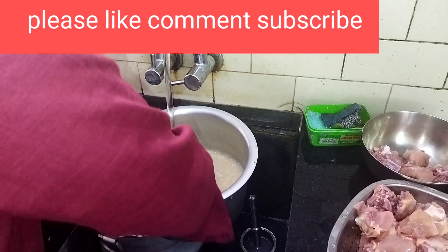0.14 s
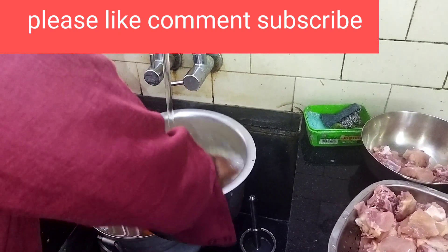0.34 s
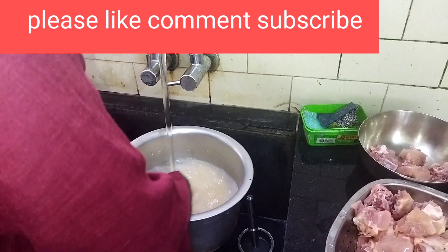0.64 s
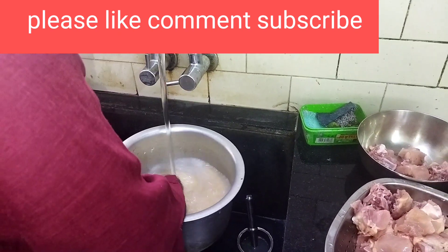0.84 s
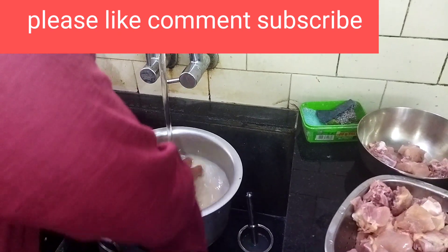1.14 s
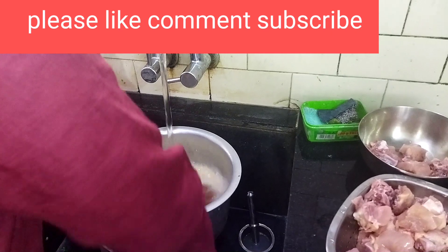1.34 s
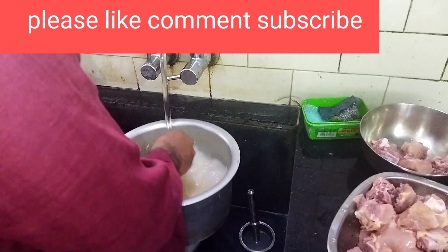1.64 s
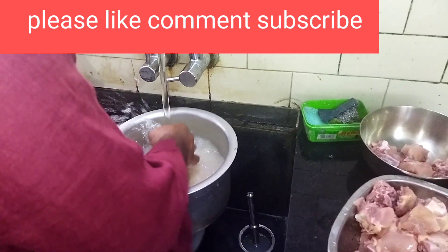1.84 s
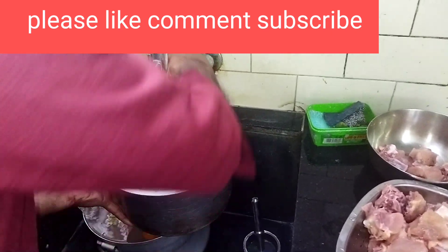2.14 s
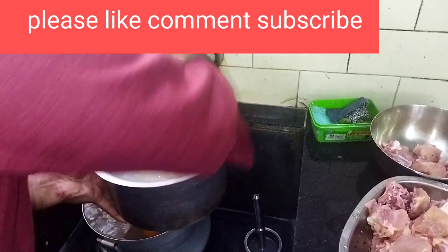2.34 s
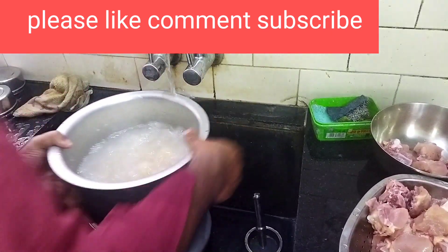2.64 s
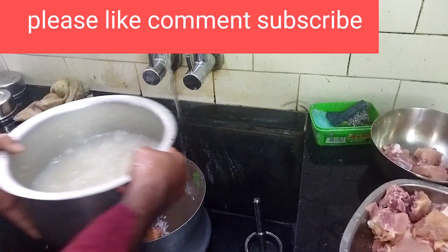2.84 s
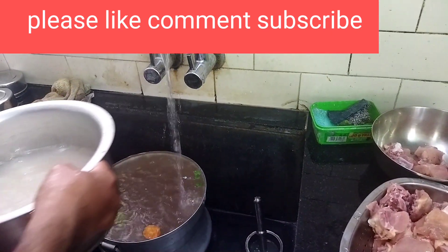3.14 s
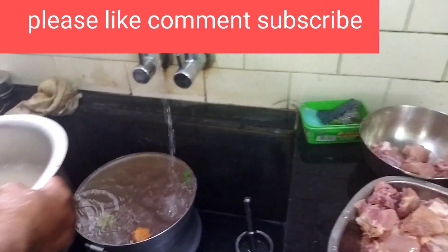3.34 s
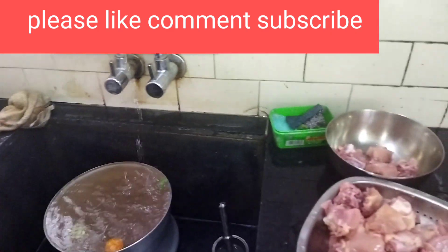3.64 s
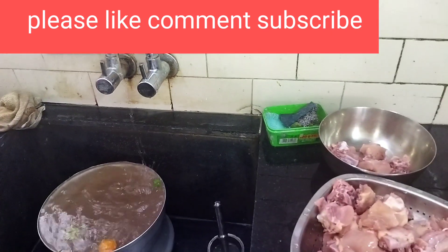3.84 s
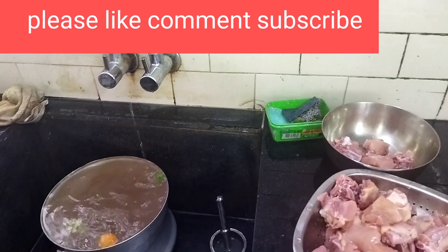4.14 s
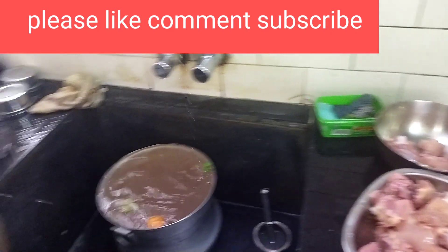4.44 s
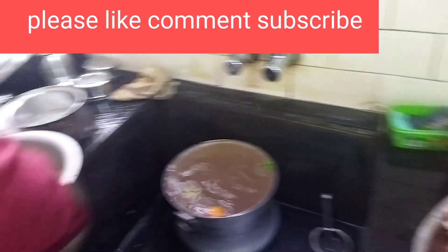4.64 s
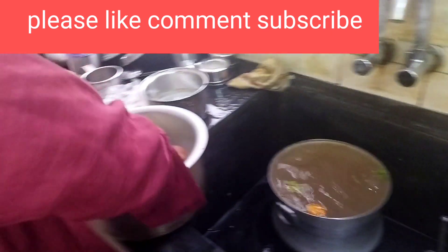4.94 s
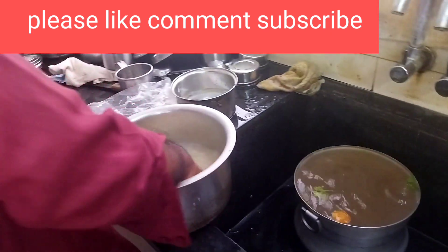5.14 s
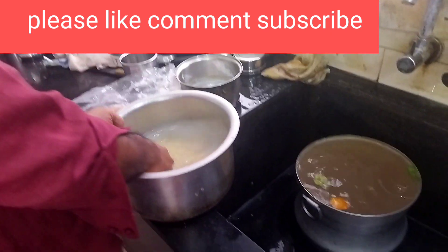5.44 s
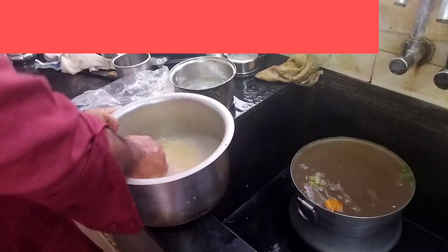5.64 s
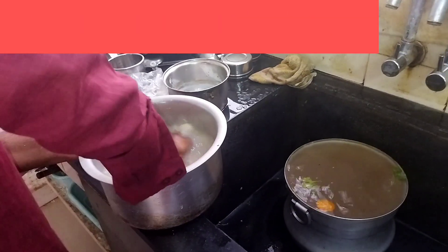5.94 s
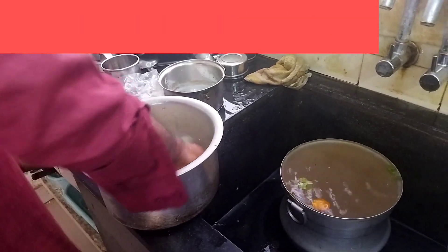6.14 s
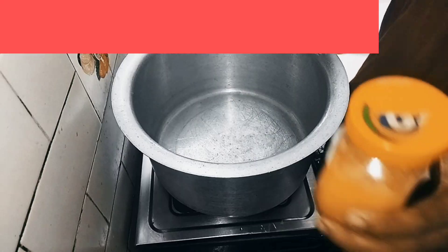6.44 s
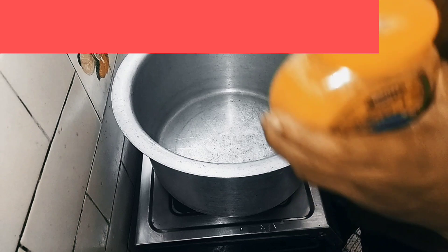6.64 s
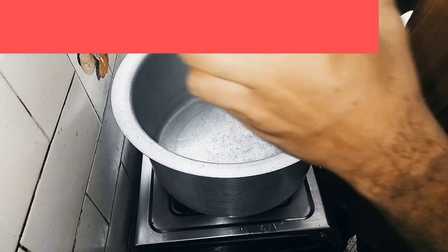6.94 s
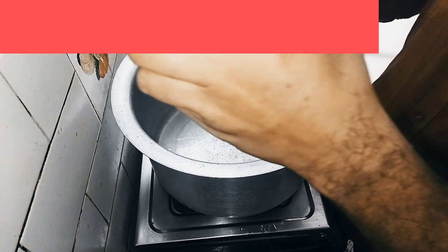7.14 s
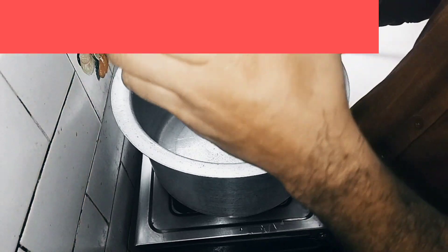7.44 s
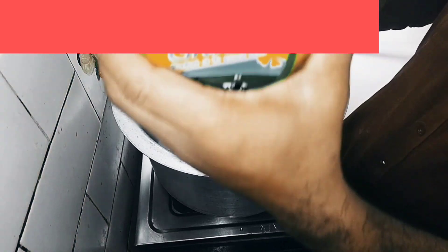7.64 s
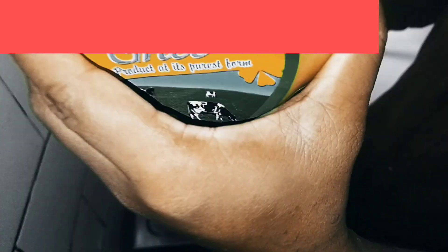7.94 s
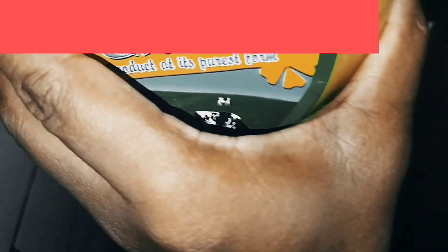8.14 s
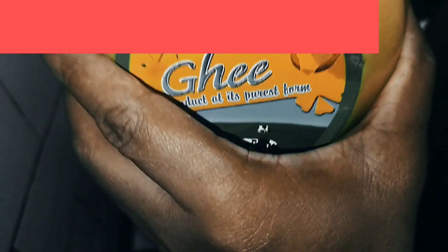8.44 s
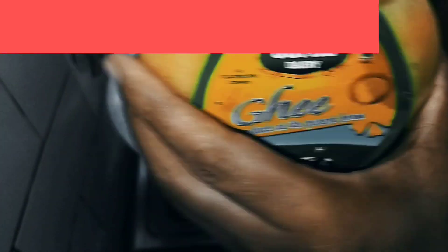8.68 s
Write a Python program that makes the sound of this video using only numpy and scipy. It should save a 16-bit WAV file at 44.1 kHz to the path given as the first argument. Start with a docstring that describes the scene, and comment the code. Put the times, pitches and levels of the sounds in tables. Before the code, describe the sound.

Splashy rice washing under a running tap, a heavy pot knocking down, sparse drips, then a quick fade to low roar with soft rubbing and tiny chinks.

```python
"""A tiled kitchen, heard by two microphone ports: tap water runs into a metal pot while a hand swirls rice in it.
The pot is lifted away and set down with a knock, and the tap dribbles out.
After a quick fade, a second spot by the stove: a low roar, soft swishes, bumps and tiny metal chinks.
Water is made of many small bubbles plus hiss; knocks and chinks are short bursts that ring or die away;
the roar, swishes and background are shaped noise, and a faint appliance hum lies under the first spot."""
import sys
import numpy as np
from scipy import signal
from scipy.fft import rfft, irfft, next_fast_len
from scipy.io import wavfile
from scipy.ndimage import uniform_filter1d

SR = 44100
rng = np.random.default_rng(int(sys.argv[2]) if len(sys.argv) > 2 else 0)


def bounce(signal):
    """Save signal as a 16-bit WAV file at the path given by the first command-line argument."""
    frames = np.transpose(np.atleast_2d(signal))
    limited = np.clip(frames, -1, 1)
    pcm = np.round(limited * 32767).astype(np.int16)
    wavfile.write(sys.argv[1], SR, pcm)


N = 388604  # samples, about 8.8 s

# All levels in the tables are relative: each source is scaled again where it is mixed.

# Tone colour of the water's gurgle, spray and slosh: pitch_hz, level_db
GURGLE_COLOUR = [(500, -83), (900, -13.5), (1300, -5.5), (1800, -4.5), (2200, 1.5), (2700, -2.5),
                 (3600, -3), (5000, -16.5), (7000, -67)]
SPRAY_COLOUR = [(2500, -90), (4000, -6), (5500, -7), (7000, -7.5), (8500, -7), (10300, 1.5), (11200, -4),
                (11900, 4), (13500, -6.5), (15500, -7.5)]
SLOSH_COLOUR = [(50, -71), (100, -8.5), (170, -15), (240, -9), (330, 3), (450, 0), (600, 3.5), (800, 2),
                (1200, 9.5)]
# Changing flow under the splashes, into the rice pot, off as it is lifted, into the full pot below, then a trickle:
# time_s, gurgle_db, spray_db, slosh_db
WATER_FLOW = [(0, -46.5, -41, -53), (.3, -42, -43.5, -58.5), (.46, -45, -46, -58), (.64, -46, -45.5, -56),
              (.9, -44, -41.5, -52), (1.3, -39.5, -40.5, -47), (1.6, -44.5, -45, -50.5),
              (1.8, -49, -45.5, -60.5), (2.08, -52, -54, -69), (2.3, -51, -44, -59),
              (2.55, -47.5, -47, -66), (2.76, -55.5, -63.5, -49.5), (2.96, -67, -65.5, -70.5),
              (3.07, -44, -49.5, -54), (3.45, -41.5, -47.5, -50.5), (3.6, -43, -47.5, -58),
              (3.68, -52, -49.5, -53), (3.9, -61.5, -55, -72.5), (4.1, -67, -72, -69.5),
              (4.7, -64.5, -58.5, -65), (5.3, -58.5, -65, -77), (6.32, -58, -62.5, -82)]
# Splashes of hand, rice and stream (rise and fall are the times for 20 dB, at least 0.003 s):
# peak_s, rise_s, fall_s, gurgle_db, spray_db, slosh_db
SPLASH_EVENTS = [(.06, 0.5, 0.23, -38, -37.5, -49), (.25, 0, 0.15, -42.5, -39, -67),
                 (.39, 0.07, -0.02, -34, -46, -47.5), (.52, 0.03, 0.07, -40, -36, -45),
                 (.7, 0.04, 0.3, -57, -41, -59), (.85, 0.13, 0, -37.5, -42, -47),
                 (1.1, 0.07, 0, -37.5, -35, -43.5), (1.28, 0, 0.03, -34.5, -32, -50),
                 (1.55, 0.2, 1, -45.5, -51, -63), (1.68, 0.05, 0, -39.5, -41.5, -70),
                 (1.818, 1.06, 0, -44, -41.5, -63), (1.881, 0.012, 0.05, -56, -37.5, -59),
                 (1.97, 0.25, 0.08, -45.5, -42, -71.5), (2.027, 0.008, 0.09, -44, -40, -71),
                 (2.135, -0.26, 0.08, -45.5, -42, -43.5), (2.24, 0.8, 0.18, -45.5, -48, -58),
                 (2.46, 0.17, 0.15, -37, -51, -48), (2.496, 0.006, 0.17, -40, -60, -42),
                 (2.565, 0.1, 0.23, -42.5, -42.5, -49.5), (2.979, -0.17, 0.1, -51, -45.5, -70),
                 (3.05, 0.005, 0.26, -44, -43, -54), (3.15, 0.18, 0.18, -41, -44.5, -65),
                 (3.26, 0.05, 0.13, -41.5, -44, -43.5), (3.33, -0.07, 0.15, -52, -39.5, -49.5),
                 (3.514, -0.1, 0.1, -51, -48, -61), (3.567, -0.2, 0.13, -45, -54, -68),
                 (3.654, 0.3, 0, -58, -70, -58), (3.795, 0.1, 0.26, -53, -69, -54),
                 (3.93, -0.4, 0.16, -54, -52, -53.5), (4.06, -0.17, 0.08, -49, -53, -64),
                 (4.34, 0.7, 0.15, -67, -58.5, -62), (4.49, -0.1, 0.07, -54, -63, -66),
                 (4.8, 0.16, 0.26, -54.5, -53, -62), (5.015, 0.14, 0.16, -47, -55, -48.5),
                 (5.2, -0.7, -0.4, -55, -73, -77), (5.42, 0.2, 0, -59, -58.5, -80),
                 (5.63, 0.1, 0.3, -56, -55, -71), (5.67, 0.03, 0.1, -51, -53, -60),
                 (5.85, 0.07, -0.1, -51, -62, -68), (5.869, 0.04, -0.02, -48, -44, -73),
                 (5.891, 0.01, 0.1, -41, -40, -79), (6.023, 0.22, -0.03, -52, -45.5, -75),
                 (6.16, 0.6, 0.5, -57.5, -56.5, -68)]
# Swarms of bubbles near one size, freed by a splash: start_s, level_db, pitch_hz, length_s
BUBBLE_SWARMS = [(0.002, -30, 2170, 0.031), (0.321, -36, 1400, 0.039), (0.388, -37.5, 1310, 0.035),
                 (0.843, -35, 1920, .02), (1.058, -31, 1930, 0.065), (1.135, -42, 1110, .03),
                 (1.222, -34, 2170, 0.022), (1.267, -30, 2060, .05), (1.29, -64, 600, .05),
                 (1.384, -36.5, 2160, 0.036), (1.527, -37.5, 1960, 0.037), (1.546, -34, 2000, 0.013),
                 (1.39, -38, 2170, .012), (1.32, -34, 1300, .03), (1.68, -34, 2070, .03),
                 (1.81, -41.5, 1310, .02), (1.951, -41.5, 1100, .015), (1.964, -26.5, 3320, 0.025),
                 (2.032, -34.5, 2120, 0.019), (2.235, -37, 2000, 0.029), (2.486, -37, 2190, 0.054),
                 (2.561, -44, 1090, 0.022), (2.131, -47.5, 594, 0.036), (2.452, -46, 506, .1),
                 (3.049, -29, 1730, .035), (3.103, -40, 1110, 0.024), (3.12, -39, 1970, 0.033),
                 (3.148, -29.5, 3180, 0.047), (3.228, -38, 1200, .02), (3.236, -35, 1010, .03),
                 (3.237, -31, 2100, .012), (3.267, -32, 2140, .012), (3.27, -35, 1240, .05),
                 (3.513, -36, 1360, 0.036), (3.47, -42, 1410, .02), (3.322, -29, 2430, 0.025),
                 (3.369, -30, 2280, 0.013), (3.453, -37.5, 1160, 0.029), (3.493, -30, 2270, 0.032),
                 (3.513, -26, 3300, 0.026), (3.563, -27.5, 3450, 0.024), (3.613, -37, 1540, 0.028),
                 (3.652, -39.5, 860, 0.043), (3.673, -40, 2760, 0.014), (3.802, -53, 2480, 0.014),
                 (3.828, -40, 2500, 0.019), (3.83, -37, 4600, .008), (3.927, -48, 2650, .02),
                 (3.944, -45, 790, 0.04), (4.053, -53.5, 2200, .03), (4.08, -57, 1080, .025),
                 (4.992, -42, 1790, 0.024), (5.008, -41, 2240, 0.048), (5.01, -38.5, 3520, .012),
                 (5.044, -41.5, 1710, 0.036), (5.637, -49, 1160, .05), (5.66, -48, 2310, .04),
                 (5.675, -49, 1150, 0.032), (5.868, -41, 2140, .02), (5.923, -48, 2300, 0.036),
                 (5.851, -44, 2190, 0.028), (5.881, -39, 2560, 0.034), (5.881, -34.5, 3400, 0.013),
                 (6.198, -44, 1910, .05)]
# Single drops that smack (pan is left minus right): start_s, smack_db, body_db, body_hz, pan_db
SINGLE_DROPS = [(0.389, -36, -36, 1440, -3), (0.518, -14.5, -46, 1380, -3), (0.7625, -22, -40.5, 1760, -9),
                (0.8437, -52, -33, 1940, 1), (1.012, -19.5, -61, 1870, -1), (1.139, -41, -38, 1110, 0.0),
                (1.2278, -40, -27, 2130, 2), (1.2844, -31, -33, 2130, -6), (1.385, -43, -31.5, 2180, 2),
                (1.4117, -42, -30.5, 2270, 2), (1.5487, -28, -36, 1970, -9), (1.81, -16.5, -47, 1350, -8),
                (1.879, -32, -28, 4380, -0.5), (1.914, -20.5, -52, 1610, -1.5),
                (2.025, -27.5, -38, 2480, -9), (2.4945, -37, -27.5, 2200, -2),
                (2.5643, -20.5, -42, 2070, 2), (2.9771, -33, -37, 4800, 5), (3.0308, -48, -30, 2110, -2.5),
                (3.0498, -47, -27.5, 1880, -2), (3.105, -36, -39, 1170, -4), (3.1283, -38, -29.5, 2200, 5),
                (3.187, -35, -31.5, 3050, 3), (3.261, -22, -36, 3100, 7), (3.328, -21.5, -36, 2420, 11),
                (3.3742, -47, -29.5, 2210, -1), (3.4505, -36, -40, 1190, 5), (3.513, -30, -27.5, 2020, 4),
                (3.566, -43, -22.5, 2600, 4.5), (3.653, -26, -43, 990, 2), (3.708, -17.5, -28.5, 6300, -5),
                (3.795, -29, -41, 2500, -2), (3.8265, -30, -39.5, 5200, -3), (3.836, -53, -38, 4380, -4),
                (3.8748, -27, -49, 2490, -5.5), (3.927, -29.5, -45, 2640, -11.5),
                (4.34, -23.5, -51.5, 1179, 3), (4.471, -42.5, -68.5, 1330, -16),
                (4.4848, -56, -46, 2700, 5), (4.553, -39, -67, 2050, -8), (4.5632, -38, -38, 4400, 9),
                (4.627, -35, -67, 1040, -12), (5.3552, -31.5, -64, 2090, 2), (5.414, -30, -64, 1870, 0.5),
                (5.6202, -36, -53, 2020, -4), (5.869, -33, -47, 2010, 18), (5.889, -27, -34, 2280, 6),
                (6.021, -29.5, -52, 2420, 18), (6.1595, -38, -55, 1430, 5)]
# Large bubbles that plop (t60 is the time to die by 60 dB): start_s, level_db, start_pitch_hz, t60_s
LARGE_BUBBLES = [(0.089, -38, 351, 0.13), (1.295, -28.5, 562, 0.12), (1.339, -36, 596, 0.075),
                 (2.129, -30, 895, 0.061), (3.06, -27.5, 349, 0.15), (3.148, -39.5, 370, 0.074),
                 (3.212, -32, 350, 0.11), (3.277, -21.5, 336, 0.053), (3.339, -33.5, 352, 0.12),
                 (4.789, -30, 970, 0.077), (4.8, -28, 966, 0.04), (4.99, -33.5, 308, 0.051),
                 (6.158, -35, 1440, 0.045), (6.166, -38, 1406, 0.055)]
# The pot lands and rocks: start_s, crack_db, thump_db, ring_db
POT_LANDINGS = [(4.1149, -17.5, -14, -47), (4.1176, -20, -7.5, -36), (4.125, -29, -14, -48),
                (4.1364, -30, -8, -43.5), (4.151, -24, -11, -48), (4.1599, -32, -11.5, -52),
                (4.171, -35.5, -14, -56.5), (4.183, -30, -8.5, -51.5), (4.2304, -41, -15, -51.5)]
# Ringing tones of a pot full of water on stone: pitch_hz, level_db, t60_s
POT_TONES = [(113.5, -7, .5), (163.5, -3.5, 1), (210, 0, .4), (226, -2.5, .4), (267, 1, 0.29),
             (298, -7, 0.44), (320, 1.5, 0.35), (374, -8.5, 0.56), (437, 5.5, 0.44), (460, 3.5, 0.55),
             (495, -0.5, .5), (532, 3, .45), (546, -0.5, 0.46), (586, 5, 0.4), (642, 3, .4),
             (700, -3.5, .3), (840, -3.5, 0.3), (903, -8, 0.27), (1010, -7, 0.2), (1166, -4, .3),
             (1287, -2.5, .3)]
# Colour of the rim's crack, and of the counter booming under the pot: pitch_hz, level_db (per Hz)
CRACK_COLOUR = [(180, -25), (400, -9), (1220, -7), (1440, -17), (1720, -8.5), (1950, -10), (2210, 1.5),
                (2520, 1.5), (2900, -14), (3630, -7.5), (4000, -8.5), (4620, -3), (5000, -10), (6000, -9.5),
                (7140, -20.5), (9500, -15.5), (11900, -13), (15500, -27)]
COUNTER_COLOUR = [(60, -41), (110, -14), (165, -2), (215, -8), (320, 2), (450, -3), (620, 2), (740, -4),
                  (1270, -7.5), (1450, -16), (1750, -4), (2500, -24.5), (5000, -26)]
# Colour of the stove's roar, the rubbing and the soft bumps: pitch_hz, level_db (per Hz)
ROAR_COLOUR = [(24, -61.5), (40, -34), (65, -20), (82, -12), (98, -17), (118, -10.5), (150, -22), (192, -6),
               (220, -10.5), (256, 2), (285, -8), (305, -5.5), (335, -13), (362, -6.5), (400, -9),
               (440, -12.5), (520, -20.5), (600, -11.5), (670, -13), (760, -22), (832, -17.5), (1240, -24),
               (1430, -26), (2090, -27.5), (3000, -38), (3900, -59), (6600, -120)]
RUB_COLOUR = [(710, -32), (1200, -5), (1620, -10), (2090, -3), (3650, -6.5), (4020, -8), (4930, -10.5),
              (5370, -11.5), (7250, -13.5), (11900, 1), (15500, -5.5)]
BUMP_COLOUR = [(35, -49), (60, -23), (260, -7.5), (396, 3), (542, -19), (674, -9), (921, -22),
               (1180, -18.5), (1890, -26), (2040, -39), (2500, -24), (3250, -53), (5500, -120)]
# Loudness of the roar as it goes: time_s, level_db
ROAR_LOUDNESS = [(6.316, -50), (6.43, -44.5), (6.5, -46), (6.7, -49.5), (7.1, -48), (7.32, -53.5),
                 (7.36, -48.5), (7.52, -44), (7.7, -47.5), (8.15, -47), (8.3, -49.5), (8.81, -47.5)]
# Hands rub over the jar (rise and fall are the times for 20 dB): peak_s, rise_s, fall_s, level_db
HAND_RUBS = [(6.48, .12, .6, -59), (6.99, .15, .25, -56), (7.45, .1, .12, -63), (7.6, .15, .22, -57),
             (7.75, .1, .35, -63), (8.15, .12, .2, -54), (8.48, .08, .25, -65), (8.7, .09, .22, -51)]
# Jar and hands bump softly: start_s, level_db
SOFT_BUMPS = [(6.46, -28), (6.62, -32.5), (6.879, -37.5), (7.069, -37.5), (7.344, -30.5), (7.439, -33.5),
              (8.45, -36)]
# Small metal chinks: start_s, level_db
METAL_CHINKS = [(6.879, -44), (6.9457, -45.5), (7.069, -44), (7.0975, -51), (7.295, -51.5), (7.5915, -46.5),
                (7.719, -42), (7.728, -47), (7.738, -44), (7.979, -53), (8.1655, -47), (8.451, -57),
                (8.6794, -48)]
# Bright bands of a chink (width is where the band's gain halves): pitch_hz, width_hz, level_db
CHINK_BANDS = [(9330, 460, -1), (10050, 600, 8.5), (11600, 420, 16), (12240, 440, 9), (13600, 900, 1)]
# Colour of the kitchen's background noise: pitch_hz, level_db (per Hz)
BACKGROUND_COLOUR = [(20, -26), (60, -12.5), (180, -6), (300, -4), (600, -10.5), (2200, -23.5), (4500, -24),
                     (7000, -29), (11500, -32), (15500, -32)]
# How alike left and right noise are, in hiss and in the echo tail: pitch_hz, likeness (0 to 1, no unit)
LEFT_RIGHT_LIKENESS = [(60, 0.78), (180, 0.88), (350, 0.96), (600, 0.082), (1400, 0), (3000, 0.075),
                       (15000, 0)]
# Dying time of the kitchen's echoes, before any shortening: pitch_hz, t60_s
KITCHEN_ECHO = [(100, 0.98), (400, 0.4), (1500, 0.43), (5000, 0.43), (15000, 0.097)]
# How the two ports differ: pitch_hz, left_minus_right_db
PORT_DIFFERENCE = [(60, 0), (300, 1), (1000, -1), (2400, -0.5), (5000, 3), (8000, 2.5), (14000, -4)]

PATCHY_DB = 3  # usual strength of the louder and softer patches in hiss
LAG_SAMPLES = 5  # the right port hears most direct sounds this much later
CUT_S, SILENT_S, FADE_OUT_S, FADE_IN_S = 6.316, 0.01, 0.081, 0.15  # from the first spot to the second


def water():
    """The stream gurgles and sprays where it lands; the hand sloshes the pot: bubbles of three size ranges."""
    gurgling, spraying, sloshing = (
        np.hypot(level(WATER_FLOW, axis=k) * flutter(), swells(SPLASH_EVENTS, axis=k + 2))
        for k in range(1, 4))
    gurgle = coloured(bubbles(726, 4950, per_s=1800, cycles=6.8, spread_db=3.7), GURGLE_COLOUR) * gurgling
    spray = coloured(bubbles(2624, 12030, per_s=2500, cycles=22.0, spread_db=3.5), SPRAY_COLOUR) * spraying
    slosh = coloured(bubbles(112.4, 1010, per_s=600, cycles=6.4, spread_db=0.84), SLOSH_COLOUR) * sloshing
    # rounder, separate bubbles
    glugs = evened(bubbles(851, 2807, per_s=90, cycles=16.0, spread_db=3.6, count=14)) * gurgling
    wet = gain_of(-3.5) * gurgle + gain_of(-6.0) * spray + gain_of(-2.5) * slosh + gain_of(-11.5) * glugs

    # Three short echo tails take turns, 1.7 times a second, so no single one colours the water
    t = np.arange(N) / SR
    shares = [np.sin(np.pi * (1.7 * t + k / 3)) ** 2 / 1.5 for k in range(3)]
    near = sum(kitchen(wet * share, 0.091, shorter=0.23) for share in shares)

    # Part of the gurgle and spray is too fine to hear as bubbles, so it is hiss
    froth = gain_of(-10) * hiss(GURGLE_COLOUR, PATCHY_DB) * gurgling
    mist = gain_of(0.5) * hiss(SPRAY_COLOUR, PATCHY_DB) * spraying * flutter()
    return near + froth + mist


def swarms():
    """Each swarm is six short rising bubbles around one pitch, thinning out as it goes."""
    out, t = np.zeros(N), np.arange(1500) / SR
    for (s, db, hz, length), draws in zip(BUBBLE_SWARMS, rng.random((len(BUBBLE_SWARMS), 6, 3))):
        for when, pitch, size in draws:
            u = t * hz * (1 + 0.16 * (2 * pitch - 1))  # cycles so far, before the rise in pitch
            blip = np.sin(2 * np.pi * u * (1 + 0.018 * u)) * np.exp(-2 * u / 8) * np.minimum(u, 1)
            add(out, s + length * when ** 2, gain_of(db + 7 - 9.4 * size - 5.5 * when) * blip)
    return kitchen(out, -6, shorter=0.2)


def drops():
    """Each drop is a bright smack of about a millisecond and a body of a few dying cycles with an overtone."""
    smack_s, body_cycles = 0.00079, 1.286
    smacks, bodies, t = np.zeros((2, N)), np.zeros((2, N)), np.arange(900) / SR
    noises = rng.standard_normal((len(SINGLE_DROPS), 900))
    for (s, smack_db, body_db, hz, pan_db), noise in zip(SINGLE_DROPS, noises):
        side = gain_of([[pan_db / 2], [-pan_db / 2]])
        burst = t / smack_s * np.exp(-t / smack_s) + 0.051 * np.exp(-t / 0.0053)  # with a faint tail
        add(smacks, s, side * gain_of(smack_db + 3.5) * noise * burst)
        tone = np.sin(2 * np.pi * hz * t) + 0.31 * np.sin(2 * np.pi * 1.537 * hz * t)
        add(bodies, s, side * gain_of(body_db + 11.0) * tone * t * hz * np.exp(-t * hz / body_cycles))
    treble = signal.butter(1, [9000, 15800], "band", fs=SR, output="sos")
    return kitchen(signal.sosfilt(treble, smacks) + bodies, -5, shorter=0.26)


def plops():
    """A large bubble rings and climbs a little in pitch as it rises."""
    out, t = np.zeros(N), np.arange(SR // 3) / SR
    for s, db, hz, t60 in LARGE_BUBBLES:
        tone = np.sin(2 * np.pi * hz * t * (1 + 0.98 * t))
        soft_start = np.minimum(t / 0.0045, 1)
        add(out, s, gain_of(db - 4.0 - 60 * t / t60) * soft_start * tone)
    return kitchen(out, -8, shorter=0.5)


def knock():
    """Cracks and thumps as the rim lands; each blow rings the pot dully, the counter booms, the kitchen answers."""
    thumps, cracks, rings, t = np.zeros(N), np.zeros(N), np.zeros(N), np.arange(1200) / SR
    u = t / 0.00036
    push = u * (1 - u / 2) * np.exp(-u)  # a smooth push and its rebound
    for s, crack_db, thump_db, ring_db in POT_LANDINGS:
        add(cracks, s, gain_of(crack_db) * rng.standard_normal(len(t)) * np.exp(-t / 0.004))
        add(thumps, s, gain_of(thump_db + 1.5) * push)
        add(rings, s, gain_of(ring_db) * ring(POT_TONES, 1.2))

    boom_db, boom_t60_s = -25.5, 0.56
    since = np.arange(N) / SR - POT_LANDINGS[0][0]  # seconds since the first blow
    dying = gain_of(boom_db - 60 * abs(since) / boom_t60_s) * np.clip(since / 0.008, 0, 1)
    boom = hiss(COUNTER_COLOUR, 4.3) * dying

    # a small pot pushes little deep bass
    thumps = signal.sosfilt(signal.butter(3, 100, "high", fs=SR, output="sos"), thumps)
    cracks = gain_of(-49.5) * coloured(cracks, CRACK_COLOUR)
    return boom + kitchen(thumps, -4) + kitchen(rings, -8) + kitchen(cracks, -8, shorter=0.97)


def stove():
    """The second spot: a lumpy low roar, rubbing swishes, soft bumps, and rattly chinks of small metal."""
    return roar() + rubbing() + bumps() + chinks()


def roar():
    """Patchy low noise whose loudness wanders."""
    return hiss(ROAR_COLOUR, 1.8, size=2048) * level(ROAR_LOUDNESS, axis=1)


def rubbing():
    """Hands rub over the jar: smooth hiss plus a grit of tiny slips, over a faint constant rustle."""
    slips = bubbles(1150, 13500, per_s=3000, cycles=1.6, spread_db=2.2)
    grit = kitchen(coloured(slips, RUB_COLOUR), -0.74, lag=0, shorter=0.17)
    swish = gain_of(-1.0) * hiss(RUB_COLOUR, PATCHY_DB) + gain_of(-2) * grit
    loudness = np.hypot(swells(HAND_RUBS, axis=3), gain_of(-70))
    return swish * loudness * (np.arange(N) > CUT_S * SR)


def bumps():
    """Soft knocks of jar and hands: dull noise that starts gently and dies away."""
    loudness, t = np.zeros(N), np.arange(SR // 4) / SR
    for s, db in SOFT_BUMPS:
        add(loudness, s, gain_of(db - 8.5 - 60 * t / 0.21) * np.minimum(t / 0.0051, 1))
    return hiss(BUMP_COLOUR, 1.5) * loudness


def chinks():
    """Small metal pieces rattle: bright banded noise with a fast and a slow dying part."""
    loudness, t = np.zeros(N), np.arange(SR // 4) / SR
    for s, db in METAL_CHINKS:
        add(loudness, s, gain_of(db - 13.5 - 60 * t / 0.32) + gain_of(db - 5.0 - 60 * t / 0.023))
    hz = np.geomspace(4000, 15500, 400)
    bands = sum(gain_of(db) / (1 + (2 * (hz - f) / width) ** 4) for f, width, db in CHINK_BANDS)
    colour = np.transpose([hz, 20 * np.log10(bands + gain_of(-16))])
    rattle = coloured(rng.standard_normal(N), colour)
    return kitchen(loudness * rattle, 5.9, lag=0)


def hum():
    """An appliance tone that wavers slightly, over the kitchen's background noise, in the first spot only."""
    waver = evened(uniform_filter1d(rng.standard_normal((2, N)), size=3000, axis=1))
    pitch_hz = 246.2 + 1.18 * waver[0]
    tone = np.sin(2 * np.pi * np.cumsum(pitch_hz) / SR) * gain_of(-59 + 2.0 * waver[1])
    background = gain_of(-59) * hiss(BACKGROUND_COLOUR, PATCHY_DB, size=1024)
    return (tone + background) * (np.arange(N) < CUT_S * SR)


def bubbles(lo_hz, hi_hz, per_s, cycles, spread_db, count=24):
    """Many small bubbles at random moments, each a dying tone that rises in pitch; a few are much louder."""
    loudness = gain_of(spread_db * np.minimum(rng.exponential(1, N), 5))
    starts = loudness * (rng.random(N) < per_s / SR)
    kind, out = rng.integers(0, count, N), np.zeros(N)
    for k, hz in enumerate(np.geomspace(lo_hz, hi_hz, count)):
        u = np.arange(int(3 * cycles * SR / hz)) * hz / SR  # cycles so far, before the rise in pitch
        blip = np.sin(2 * np.pi * u * (1 + 0.00553 * u)) * np.exp(-2 * u / cycles) * np.minimum(u, 1)
        out += signal.oaconvolve(starts * (kind == k), blip / np.linalg.norm(blip))[:N]
    return out


def hiss(spectrum, patchy_db, size=512):
    """Stereo noise with drifting louder and softer patches in time and pitch."""
    frames, hz = 4 * N // size + 5, np.fft.rfftfreq(size, 1 / SR)
    a, b, c, d, patches = rng.standard_normal((frames, len(hz), 5)).T
    patches = uniform_filter1d(uniform_filter1d(patches, size=8, axis=0), size=16, axis=1)
    z = alike(a + 1j * b, c + 1j * d, hz) * gain_of(patchy_db * evened(patches))
    noise = signal.istft(z, nperseg=size, noverlap=size * 3 // 4)[1][:, :N]
    return coloured(noise, spectrum)


def ring(modes, seconds):
    """Dying sines of one struck object, each starting at a random point of its cycle."""
    t = np.arange(int(seconds * SR)) / SR
    return sum(gain_of(db - 60 * t / t60) * np.sin(2 * np.pi * (hz * t + rng.random()))
               for hz, db, t60 in modes)


def flutter():
    """Quick random unevenness of the flow, as a gain: 40 sines from 4 to 60 Hz added up."""
    t = np.arange(0, N / SR + .01, .002)
    wobble = sum(np.sin(2 * np.pi * (f * t + rng.random())) / f ** 0.53 for f in np.geomspace(4, 59.95, num=40))
    return gain_of(1.77 * np.interp(np.arange(N) / SR, t, evened(wobble)))


def swells(events, axis):
    """Swells that rise and fall straight in dB, added in power."""
    t, power = np.arange(0, N / SR + .01, .002), 0
    for row in events:
        peak_s, rise_s, fall_s = row[0], max(row[1], .003), max(row[2], .003)
        steps = np.maximum((peak_s - t) / rise_s, (t - peak_s) / fall_s)  # 20 dB each
        power = power + gain_of(row[axis] - 20 * steps) ** 2
    return np.interp(np.arange(N) / SR, t, np.sqrt(power))


def kitchen(x, wet_db, lag=LAG_SAMPLES, shorter=1):
    """Direct sound plus a tail of sparse echoes; each band dies at its own speed, and the bass is mostly shared."""
    taps = np.zeros((2, SR))
    at = np.arange(200, SR - 20, 20) + rng.integers(0, 20, (2, (SR - 201) // 20))
    np.put_along_axis(taps, at, rng.choice([-1., 1.], at.shape), 1)
    hz, t, (a, b) = signal.stft(taps, SR, nperseg=256)
    t60 = shorter * read(KITCHEN_ECHO, hz)[:, None]
    tail = signal.istft(alike(a, b, hz) * gain_of(-60 * t / t60), SR, nperseg=256)[1]
    tail = tail / np.linalg.norm(tail, axis=1, keepdims=True)
    direct = x * np.ones((2, 1))
    wet = signal.fftconvolve(direct, tail, axes=1)[:, :N]
    return np.array([direct[0], np.roll(direct[1], lag)]) + gain_of(wet_db) * wet


def alike(left, other, hz):
    """Left and right made partly alike, by an amount that depends on pitch."""
    same = np.clip(read(LEFT_RIGHT_LIKENESS, hz), -1, 1)[:, None]
    return np.array([left, same * left + np.sqrt(1 - same ** 2) * other])


def coloured(x, spectrum):
    """Filters by a spectrum and sets the average strength (rms) to 1."""
    size = next_fast_len(N)
    gain = gain_of(read(spectrum, np.fft.rfftfreq(size, 1 / SR)))
    return evened(irfft(rfft(x, size) * gain, size)[..., :N])


def level(table, axis):
    """One dB column as a gain in time, nearly silent (-120 dB) outside the table."""
    rows = np.array(table)
    return gain_of(np.interp(np.arange(N) / SR, rows[:, 0], rows[:, axis], -120, -120))


def read(points, hz):
    """Reads a pitch table between its points, on a log pitch scale."""
    f, value = np.transpose(points)
    return np.interp(np.log(hz + 1), np.log(f + 1), value)


def add(mix, s, sound):
    """Adds a sound to the mix from s seconds on, cut at the end."""
    part = mix[..., round(s * SR):][..., :sound.shape[-1]]
    part += sound[..., :part.shape[-1]]


def gain_of(db):
    """Turns dB into a plain multiplier."""
    return 10 ** (np.asarray(db) / 20)


def evened(x):
    """Scales to an average strength (rms) of 1."""
    return x / np.sqrt(np.mean(x ** 2) + 1e-20)


def scene():
    """All layers, from the water to the background."""
    return water() + swarms() + drops() + plops() + knock() + stove() + hum()


def record(dry):
    """The ports differ in tone and lose deep bass; then the fade between the two spots and a treble limit."""
    size = next_fast_len(N)
    hz = np.fft.rfftfreq(size, 1 / SR)
    tilt = gain_of(np.outer([.5, -.5], read(PORT_DIFFERENCE, hz)))
    tilt = tilt * np.minimum(hz / 50, 1) ** 0.73  # the microphone cuts deep bass
    heard = irfft(rfft(dry, size) * tilt, size)[:, :N] * gain_of(2.5)
    away = np.arange(N) / SR - CUT_S  # seconds from the cut
    fade = np.clip(np.maximum(-away / FADE_OUT_S, (away - SILENT_S) / FADE_IN_S), 0, 1) ** 1.25
    treble_limit = signal.firwin(511, 15900, window=("kaiser", 9), fs=SR)
    return signal.oaconvolve(heard * fade, treble_limit[None], "same")


dry = scene()
out = record(dry)
bounce(out)
```